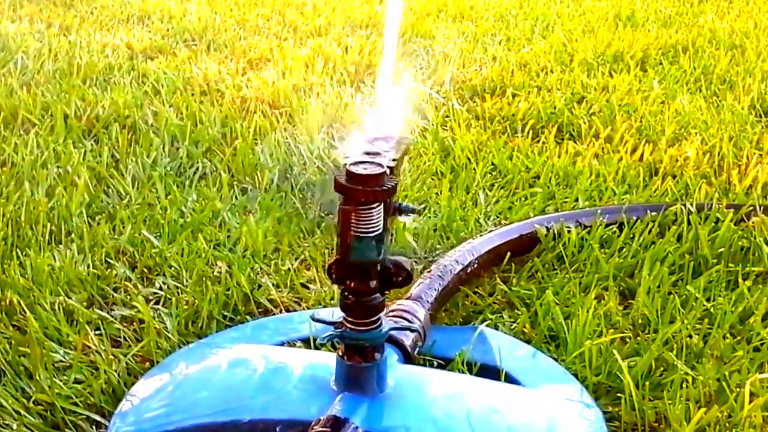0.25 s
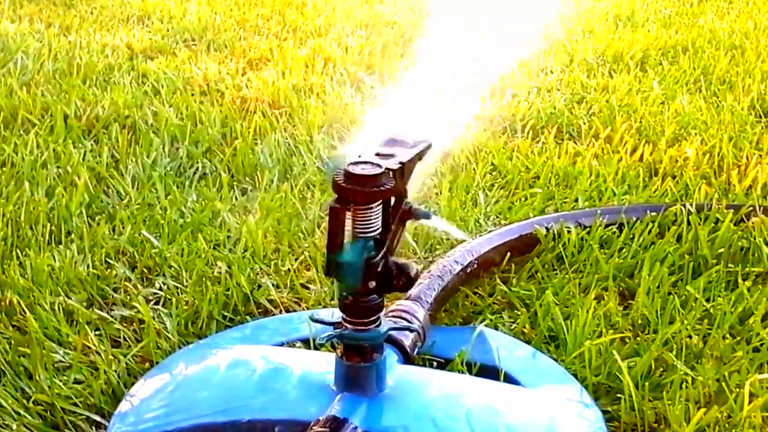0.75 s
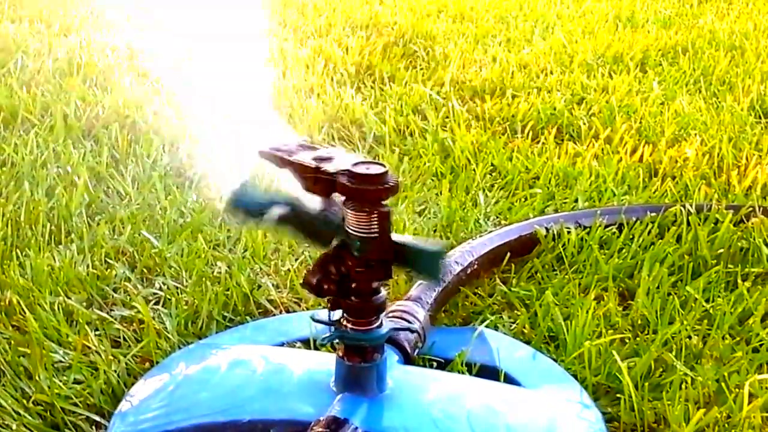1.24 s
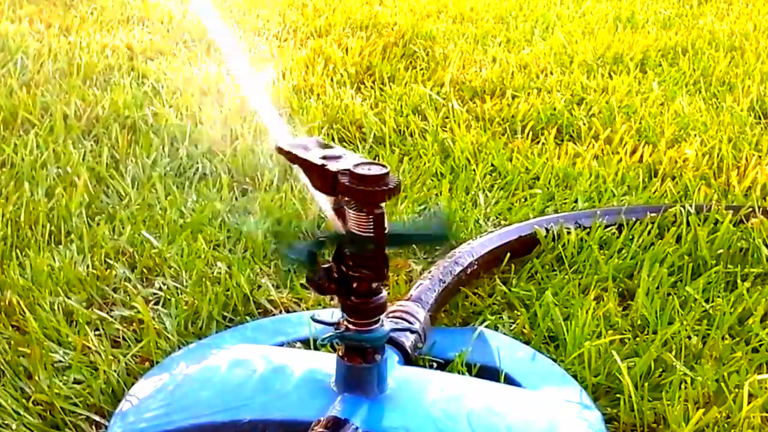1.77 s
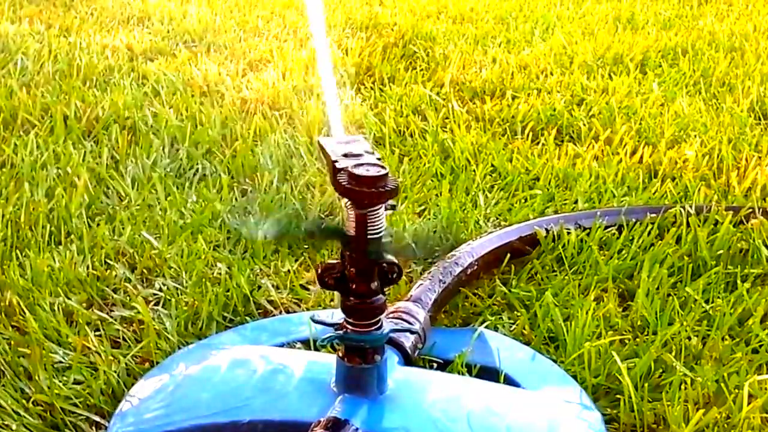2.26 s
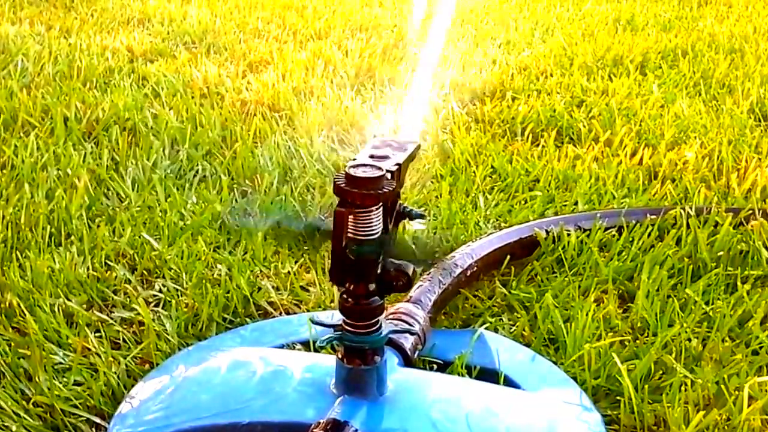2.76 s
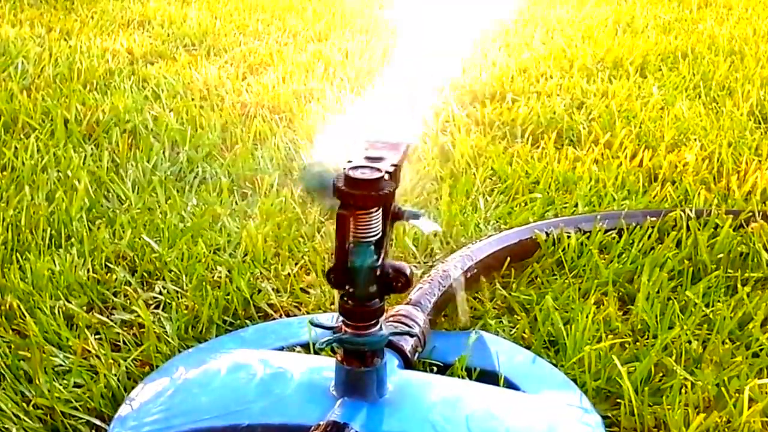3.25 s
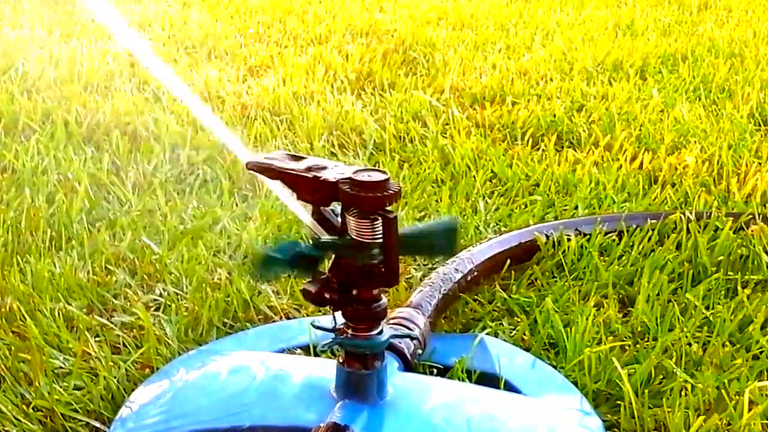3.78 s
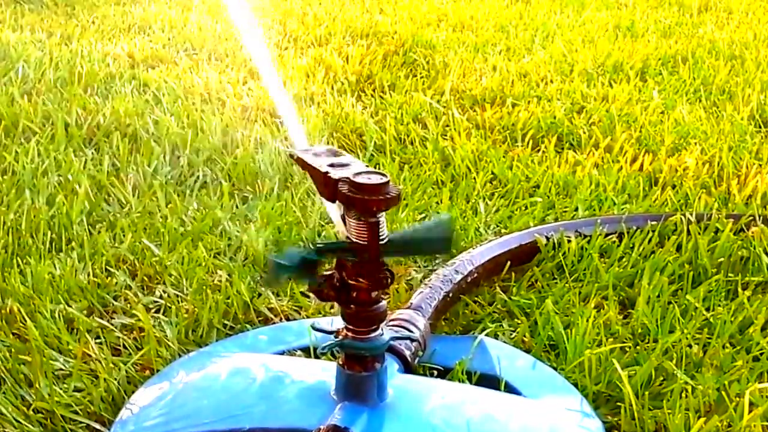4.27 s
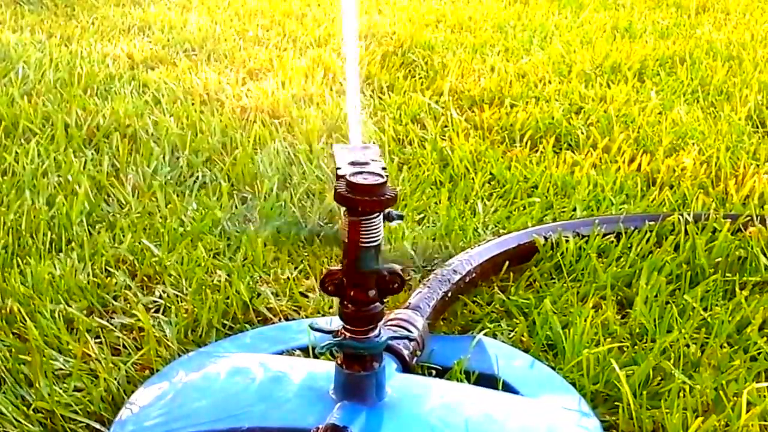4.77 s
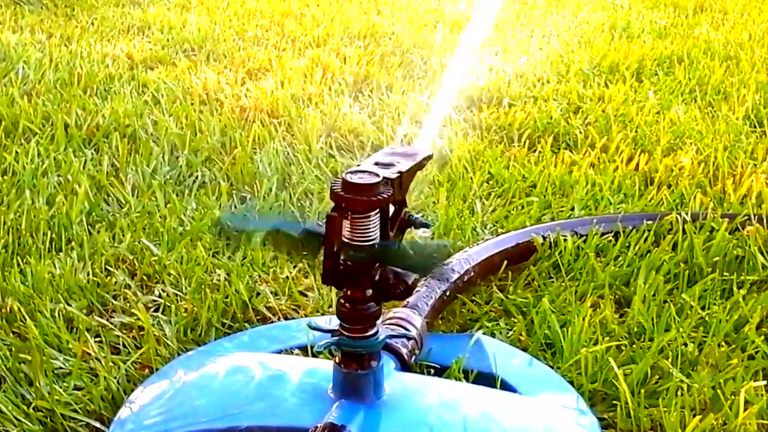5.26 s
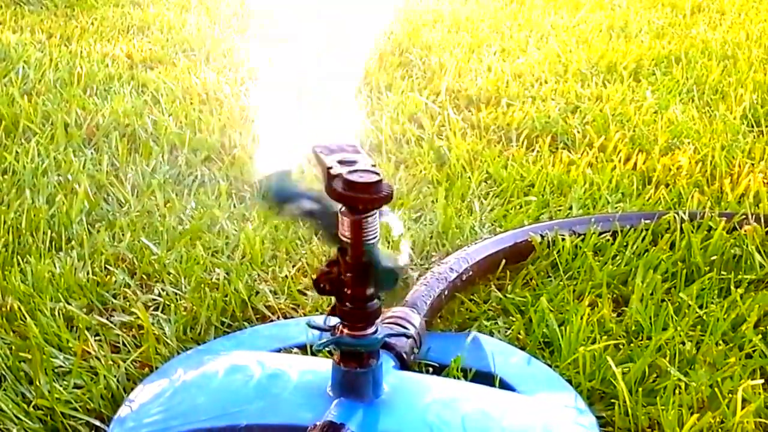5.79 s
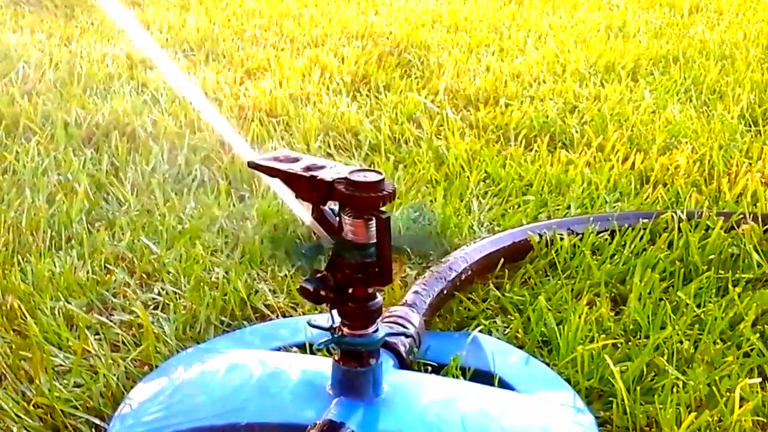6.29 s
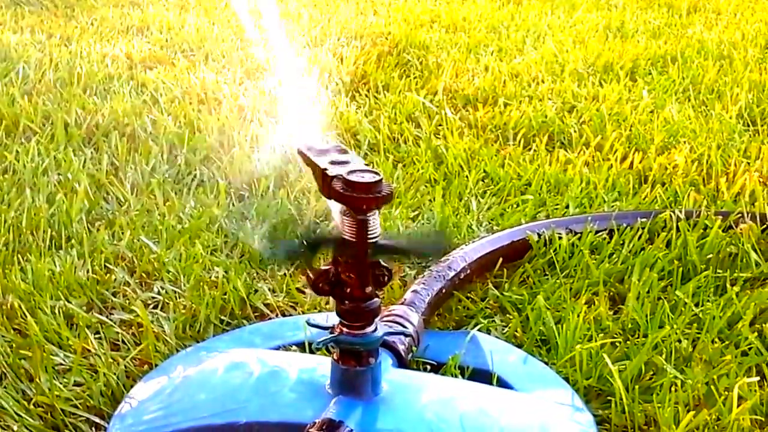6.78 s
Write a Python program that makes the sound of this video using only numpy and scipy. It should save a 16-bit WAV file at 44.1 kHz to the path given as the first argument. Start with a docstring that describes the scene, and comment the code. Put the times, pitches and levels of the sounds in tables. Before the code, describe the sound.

Close, dry plastic ticking of a lawn sprinkler with splashy slaps and quick sputtering returns, over faint traffic and a later distant engine.

```python
"""Impact sprinkler on a lawn

A sprung arm swings into the jet and knocks the frame about nine times a second: contact pulses excite damped
modes. On the way back it flutters three times as fast, with longer splashes of shaped droplet noise.
The jet hisses as filtered random impacts, and delayed bursts of them patter on frame and grass.
Far traffic is low filtered noise; one engine, a sum of harmonics, gathers speed from 3.5 s on."""
import sys
import numpy as np
from scipy import signal
from scipy.io import wavfile
from scipy.ndimage import uniform_filter1d

SR = 44100
rng = np.random.default_rng(int(sys.argv[2]) if len(sys.argv) > 2 else 0)


def waveform_to_disk(signal):
    """Save audio, clipped to [-1, 1], as 16-bit WAV at the path in sys.argv[1]."""
    frames = np.transpose(np.atleast_2d(signal))
    scaled = np.clip(frames, -1, 1) * 32767
    samples = np.round(scaled).astype(np.int16)
    wavfile.write(sys.argv[1], SR, samples)


N = 310023

# Fast flutter of the arm: spoon enters the jet t/s, splash relative level/dB, return-stop blow relative level/dB
FLUTTER_STROKES = [(0.8105, -32.5, -14), (0.8495, -31, -6.5), (0.8856, -25, -3), (0.92, -33, -13),
                   (0.9553, -31.5, -8), (0.9892, -31.5, -9), (1.0249, -30.5, -7.5), (1.059, -31, -8),
                   (1.093, -31, -9), (1.127, -30.5, -9), (1.162, -29.5, -11), (1.1954, -29.5, -11),
                   (1.2302, -28.5, -7), (1.2623, -27.5, -8), (1.2952, -27.5, -8), (1.3266, -28.5, -9),
                   (1.3587, -27, -7.5), (1.3907, -27.5, -21), (3.1719, -25.5, -19), (3.222, -30.5, -18),
                   (3.26, -30.5, -6.5), (3.2955, -30.5, -16), (3.3283, -32, -4), (3.365, -31.5, -15),
                   (3.3988, -31.5, -4.5), (3.433, -31, -9.5), (3.4685, -29.5, -7.5), (3.5026, -29, -10),
                   (3.5371, -30, -7.5), (3.5703, -30, -9), (3.605, -28, -10), (3.6395, -27.5, -8),
                   (3.6722, -27, -10), (3.7043, -27.5, -8.5), (3.7354, -29.5, -13), (3.769, -28.5, -7),
                   (3.799, -27.5, -24), (5.58, -32.5, -14), (5.615, -31, -6), (5.6499, -32, -11),
                   (5.6852, -30, -7.5), (5.72, -31, -10), (5.756, -31.5, -6.5), (5.7903, -30.5, -8),
                   (5.827, -30.5, -8), (5.8588, -31, -11), (5.8939, -29.5, -7), (5.9283, -30.5, -12),
                   (5.963, -30, -7.5), (5.9963, -29, -12), (6.0323, -28, -8), (6.0637, -28.5, -10),
                   (6.0952, -28.5, -10), (6.1271, -27.5, -7), (6.158, -27.5, -12), (6.1903, -28.5, -25)]
# Return sweeps: lever trips t/s, flutter's end t/s (in the last row, the next trip less the arc's length)
RETURN_SWEEPS = [(0.785, 1.41), (3.142, 3.82), (5.5525, 5.5)]


def gain_of(db):
    """Amplitude ratio of a level in dB."""
    return 10 ** (np.asarray(db) / 20)


def evened(x):
    """Normalises a signal to unit rms."""
    return x / np.sqrt(np.mean(x ** 2) + 1e-20)


def read(points, hz):
    """Interpolates a level spectrum along a logarithmic frequency axis."""
    f, db = np.transpose(points)
    return np.interp(np.log(hz + 1), np.log(f + 1), db)


def curve(rows):
    """Linear interpolation of a time table at every sample."""
    rows = np.array(rows)
    return np.interp(np.arange(N) / SR, rows[:, 0], rows[:, 1])


def add(mix, s, sound):
    """Superposition: adds a sound to the mix from s seconds on."""
    part = mix[max(round(s * SR), 0):][:len(sound)]
    part += sound[:len(part)]


def causal(gain):
    """Minimum-phase response: the Hilbert transform of log gain gives the phase."""
    log = np.log(np.maximum(np.r_[gain, gain[-2:0:-1]], 1e-5))
    return np.fft.ifft(np.exp(log - 1j * signal.hilbert(log).imag)).real[:len(gain)]


def coloured(x, points, size=8192):
    """Causal filtering by a spectrum; unit-energy taps keep the power of white noise."""
    taps = causal(gain_of(read(points, np.fft.rfftfreq(size, 1 / SR))))
    return signal.oaconvolve(x, taps / np.linalg.norm(taps))[:N]


def wobble(size):
    """Low-passed noise of unit rms: two running means, each size samples long."""
    once = uniform_filter1d(rng.standard_normal(N), size)
    return evened(uniform_filter1d(once, size))


def droplets(per_s, spread_db):
    """Shot noise: dense random impacts, a few of them large."""
    size = gain_of(spread_db * np.minimum(rng.exponential(1, N), 5))
    lands = rng.random(N) < per_s / SR
    return evened(size * rng.standard_normal(N) * lands)


def jet():
    """Turbulent jet noise: a fluttering hiss that swells into mist on the first two return sweeps."""
    # Hiss spectrum: f/Hz, relative level/dB
    hiss = [(350, -6), (700, -0.5), (1500, -2.5), (2800, -5), (5000, -6), (7500, -6), (10000, -11.5),
            (13000, -13.5), (16000, -15)]
    jet_db, mist_db, mist_late_db = -46.5, -41, -38.5
    rise_s, fall_s = 0.17, 0.12
    points = []
    for trip, end in RETURN_SWEEPS[:2]:
        points += [(trip - .02, jet_db), (trip - .02 + rise_s, mist_db)]
        points += [(end + 0.034 - fall_s, mist_late_db), (end + .03, jet_db)]
    level = gain_of(curve(points) + 0.64 * wobble(size=700))
    return level * coloured(droplets(20000, 1.6), hiss)


def traffic():
    """Distant traffic as low-frequency noise of slowly varying level."""
    # Traffic spectrum: f/Hz, relative level/dB
    hum = [(14, -35), (24, -23), (45, -11), (107, 0.5), (145, 0.5), (176, -1), (199, -6), (322, -14.5),
           (430, -26.5), (560, -54), (950, -120)]
    # Traffic level in time, before the slow wobble: t/s, level/dB
    loudness = [(0.0, -41.5), (7.03, -38)]
    level = gain_of(curve(loudness) + 0.56 * wobble(size=6000))
    return level * coloured(rng.standard_normal(N), hum, size=16384)


def is_second(s):
    """Marks times close to the second blow after the first two return sweeps."""
    return sum(abs(s - end - .2) < .02 for _, end in RETURN_SWEEPS[:2]) > 0


def swings():
    """Forced oscillation of the arm: rows (s, blow dB, rebound ms, rebound dB, cut ms, slap dB, tick dB)."""
    # Slow swings: blow t/s, blow relative level/dB
    blows = [(0.0172, -2.5), (0.1273, -3.5), (0.2372, -3.5), (0.3467, -3), (0.4562, -3), (0.5659, -2),
             (0.675, -2.5), (0.783, -6), (1.497, -10), (1.6091, -5), (1.7179, -3), (1.827, -4.5),
             (1.9364, -2), (2.0459, -4), (2.1545, -4), (2.2643, -2.5), (2.3747, -4), (2.4837, -3),
             (2.5935, -3.5), (2.7039, -2), (2.8136, -4), (2.9227, -2), (3.032, -2), (3.1411, -3),
             (3.9089, -20), (4.02, -6), (4.1284, -7), (4.2378, -2.5), (4.3475, -2), (4.4564, -1.5),
             (4.5663, -2.5), (4.6764, -2.5), (4.7857, -3), (4.896, -2), (5.0053, -3.5), (5.116, -3.5),
             (5.2251, -4.5), (5.3344, -4.5), (5.4436, -2), (5.5527, -3), (6.3035, -4.5), (6.4147, -2.5),
             (6.5222, -2.5), (6.632, -3.5), (6.7417, -1.5), (6.8507, -2), (6.9606, -1.5)]
    arc_s = 1.75  # forward sweep, up to the next trip
    s, db = np.transpose(blows)
    trips = np.r_[np.array(RETURN_SWEEPS)[:, 0], RETURN_SWEEPS[-1][1] + arc_s]
    left = trips[np.searchsorted(trips, s - .01)] - s  # seconds until the lever trips
    turned = np.clip(1 - left / arc_s, 0, 1)
    late, hard = rng.random((len(s), 2)).T
    # The arm bounces once, by chance a little later or harder
    rebound_ms = np.where(is_second(s), 4.7, 1.9 + 3.1 * late ** 2)
    rebound_db = np.where(is_second(s), -12, -14.5 + 4.5 * (2 * hard - 1))
    cut_ms = np.where(left < .05, 18, 10.93)  # from the blow until the spoon leaves the jet; longer at the trip
    slap_db = -29 - 3 * turned ** 2
    tick_db = np.where(abs(left - .11) < .05, -16, -26 + 3 * turned)  # louder at the blow before the trip
    return np.c_[s, db, rebound_ms, rebound_db, cut_ms, slap_db, tick_db]


def contacts(slow):
    """Impulsive excitation: each blow is two contacts in quick succession, with a noisy scuff."""
    # Dry stray clicks: t/s, relative level/dB
    clicks = [(0.9132, -9), (4.2048, -25), (4.2155, -17), (4.2203, -17), (4.2305, -22)]
    # Lever clicks around each trip: t/ms from the trip, relative level/dB
    lever = [(-10.5, -20.5), (10, -3.5), (19.4, -15)]
    tick_ms, stop_ms = 24.3, 19  # the trip pawl drops back after a blow; the fluttering arm meets its return stop
    hard, dull, stray = np.zeros((3, N))
    blows = []
    for s, blow_db, rebound_ms, rebound_db, _, _, tick_db in slow:
        blows += [(s, blow_db, hard), (s + rebound_ms / 1000, rebound_db, hard)]
        blows.append((s + tick_ms / 1000, tick_db, hard))
    blows += [(s, db, stray) for s, db in clicks]
    blows += [(s + stop_ms / 1000, db, dull) for s, _, db in FLUTTER_STROKES]
    blows += [(s + ms / 1000, db, hard) for s, _ in RETURN_SWEEPS for ms, db in lever]
    t = np.arange(60) / SR
    pair = np.sinc(t * SR - 4) * .7 + np.sinc((t - .000605) * SR - 4)
    for s, db, track in blows:
        scuff = .08 * rng.standard_normal(60) * np.exp(-t / .0008)  # wet faces never meet quite alike
        add(track, s - .0006, gain_of(db) * (pair + scuff))
    return hard, dull, stray


def cracks(hard, dull, stray):
    """Broadband contact radiation, cross-faded between two spectra as the head turns through its arc."""
    # Crack spectrum at the start of the arc: f/Hz, relative level/dB
    facing = [(450, -45), (1500, -18), (3000, -12), (5000, -2), (6500, -3), (9000, 0), (12000, -10),
              (16000, -12)]
    # Crack spectrum with the arm turned aside: f/Hz, relative level/dB
    aside = [(450, -27), (1500, -10), (3000, -12.5), (5500, 5.5), (7000, -0.5), (8000, -7.5), (9500, -1.5),
             (12000, -21), (16000, -22.5)]
    entries, now = np.r_[-.97, np.array(FLUTTER_STROKES)[:, 0]], np.arange(N) / SR
    since_flutter = now - entries[np.searchsorted(entries, now) - 1]
    away = np.clip(since_flutter / 1.6, 0, 1)
    struck = gain_of(4.5) * (hard + stray) + gain_of(-19) * dull
    return coloured((1 - away) * struck, facing) + coloured(away * struck, aside)


def rings(hard, dull):
    """Modal synthesis: blows excite exponentially damped sines of base, frame and arm."""
    # Modes of the plastic frame and hollow base: f/Hz, relative level/dB, 60 dB decay time/s
    resonances = [(680, -18, 0.046), (837, -13, 0.024), (1480, -14, 0.024), (1770, -14, 0.011),
                  (2503, -13, 0.037), (2892, -6, 0.028), (3194, -7.5, 0.024), (4580, 4.5, 0.017),
                  (4925, 8, 0.016), (5460, -14, 0.087)]
    t = np.arange(4000) / SR
    modes = [gain_of(db - 60 * t / t60) * np.sin(2 * np.pi * hz * t) for hz, db, t60 in resonances]
    base, frame, arm = sum(modes[:2]), sum(modes[2:7]), sum(modes[7:])
    # Slow blows ring base, frame and a little of the arm
    forward = gain_of(-12.0) * base + gain_of(-17.5) * frame + gain_of(-23.5) * arm
    back = gain_of(-22.5) * frame + gain_of(-24) * arm
    jolts = np.zeros(N)
    for s, _, db in FLUTTER_STROKES:
        # The return stop jolts the hollow base, with less spread than the blows
        add(jolts, s + .0145, [gain_of(0.59 * db - 11.0)])
    second_blows = gain_of(-21) * hard * is_second(np.arange(N) / SR)  # extra ring of the arm
    ringing = signal.oaconvolve(hard, forward)[:N] + signal.oaconvolve(dull, back)[:N]
    ringing = ringing + signal.oaconvolve(jolts, base)[:N]
    return ringing + signal.oaconvolve(second_blows, arm)[:N]


def knocks(slow):
    """Radiation from a small body: cracks and rings lose their bass."""
    hard, dull, stray = contacts(slow)
    small = signal.butter(6, 560, "high", fs=SR, output="sos")  # too small to radiate bass
    return signal.sosfilt(small, cracks(hard, dull, stray) + rings(hard, dull))


def stroke(rise_ms, hold_ms, sag_db, fall_ms):
    """Splash envelope: a sine-squared swell, a sag linear in dB, then exponential decay."""
    ms = np.arange(round((rise_ms + hold_ms + 8 * fall_ms) * SR / 1000)) * 1000 / SR
    swell = np.sin(np.pi / 2 * np.clip(ms / rise_ms, 0, 1)) ** 2
    sag = gain_of(-sag_db * np.clip((ms - rise_ms) / hold_ms, 0, 1))
    return swell * sag * np.exp(-np.maximum(ms - rise_ms - hold_ms, 0) / fall_ms)


def spoon(slow):
    """Jet break-up: droplet noise with a fast random level, gated while the spoon is in the jet."""
    # Spectrum of the slow slaps: f/Hz, relative level/dB
    slap_tone = [(300, -45), (600, -14), (1200, -11), (3000, -9), (5000, -3), (6800, 0), (8500, -1),
                 (10000, -8), (12000, -14), (16000, -17)]
    # Spectrum of the flutter splashes: f/Hz, relative level/dB
    splash_tone = [(300, -63), (600, -18), (1200, -15.5), (2200, -11), (4000, -6), (7000, 0), (9500, -5.5),
                   (12000, -12), (16000, -15.5)]
    slap, splash = np.zeros((2, N))
    for s, _, _, _, cut_ms, db, _ in slow:
        add(slap, s - .004, gain_of(db) * stroke(6.63, cut_ms - 5, 4.6, 2.7))  # touches the jet before the blow
    for s, db, _ in FLUTTER_STROKES:
        stay_ms = 19.7 - 0.33 * (db + 30)  # shorter when hard
        add(splash, s - .002, gain_of(db) * stroke(7.1, stay_ms - 6.5, 4.2, 2.2))
    tearing = gain_of(1.1 * wobble(size=40)) * droplets(30000, .8)
    slaps = gain_of(9.5) * coloured(slap * tearing, slap_tone)
    return slaps + gain_of(6.5) * coloured(splash * tearing, splash_tone)


def patter(slow):
    """Delayed shot noise: thrown spray comes down on frame and grass after its flight."""
    # Patter spectrum: f/Hz, relative level/dB
    tone = [(300, -4), (600, 0), (2500, -15), (4500, -5), (8500, -5), (11000, -14.5), (16000, -28)]
    thrown = np.zeros(N)
    for s, _, _, _, _, db, _ in slow:
        add(thrown, s, [gain_of(db)])
    for s, db, _ in FLUTTER_STROKES:
        add(thrown, s, [gain_of(db - 3)])
    flight = np.zeros(round(.019 * SR))
    landing = np.r_[flight, stroke(5., 12., 3, 26.)]
    fall = signal.oaconvolve(thrown, landing)[:N]
    return gain_of(-12.0) * coloured(fall * droplets(9000, 2.8), tone)


def engine():
    """Harmonic synthesis: orders of the engine cycle, lifted where they cross the exhaust pipe resonance."""
    # Engine speed, before a slight jitter: t/s, cycle rate f/Hz
    speed = [(3.5, 17.3), (4.3, 18.2), (5.2, 22.1), (5.4, 24.4), (5.6, 25.7), (5.8, 26.2), (6.2, 28.6),
             (6.7, 31.0), (6.9, 30.3)]
    # Exhaust orders: multiple of the cycle rate, relative level/dB
    exhaust = [(1, -48), (2, -33), (3, -51), (4, -17), (5, -8.5), (6, -1.5), (7, -7.5), (8, -25), (9, -10),
               (10, -26), (11, -38), (12, -25)]
    # Engine loudness: t/s, relative level/dB
    loudness = [(3.5, -46), (4.3, -40.5), (5.1, -36.5), (5.45, -34.5), (6.0, -34), (6.65, -32), (6.74, -42),
                (6.84, -44), (6.91, -31.5), (7.0, -44)]
    pipe_hz, pipe_width_hz, pipe_db = 150.5, 69, 5
    revs = curve(speed)
    turns = np.cumsum(revs * (1 + .002 * wobble(size=4000))) / SR
    orders = np.zeros(N)
    for k, db in exhaust:
        lift = pipe_db / (1 + (2 * (k * revs - pipe_hz) / pipe_width_hz) ** 2)
        level = gain_of(db + lift + 1.5 * wobble(size=9000))
        orders += level * np.cos(2 * np.pi * k * turns - .3 * k)
    arrives = np.clip((np.arange(N) / SR - speed[0][0]) / 0.45, 0, 1)
    return gain_of(curve(loudness)) * arrives * orders


def turf(x):
    """Ground reflection: a delayed, weaker copy whose treble the grass absorbs."""
    delay_ms, echo_db, absorbed_above_hz = 1.124, -10, 3100
    dulled = signal.lfilter(*signal.butter(2, absorbed_above_hz, fs=SR), x)
    return x + gain_of(echo_db) * np.r_[np.zeros(round(delay_ms * SR / 1000)), dulled][:N]


def scene():
    """Superposition: the sprinkler sounds with their turf echo, and the far road without it."""
    arm = swings()
    sprinkler = jet() + knocks(arm) + spoon(arm) + patter(arm)
    return (turf(sprinkler) + traffic() + engine())[None]


def record(dry):
    """Microphone response: port resonances in the treble, clipping of the highest peaks, then a band limit."""
    # Resonances of the microphone port: f/Hz, width/Hz, level/dB
    port = [(4200, 820, 3.5), (4686, 530, 9), (5360, 225, 13.5), (6700, 1470, 1), (8540, 660, -4.5)]
    hz = np.fft.rfftfreq(4096, 1 / SR)
    power = 1 + sum(gain_of(2 * db) / (1 + (2 * (hz - f) / width) ** 2) for f, width, db in port)
    ringing = signal.oaconvolve(dry, causal(np.sqrt(power))[None])[:, :N]
    heard = np.clip(ringing, -1, 1)
    band = signal.firwin(401, 15520, window=("kaiser", 9), fs=SR)  # upper limit in Hz
    return signal.oaconvolve(heard, band[None], "same")


dry = scene()
out = record(dry)
waveform_to_disk(out)
```